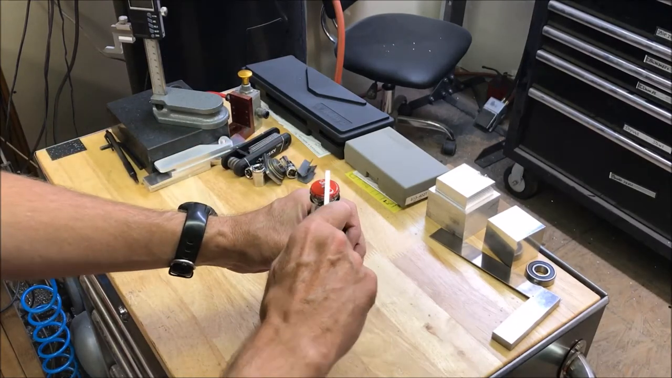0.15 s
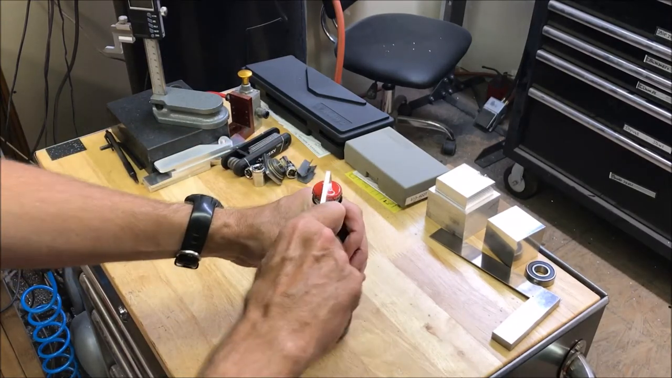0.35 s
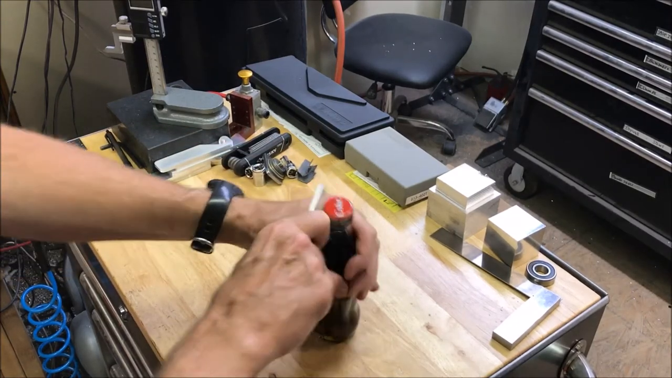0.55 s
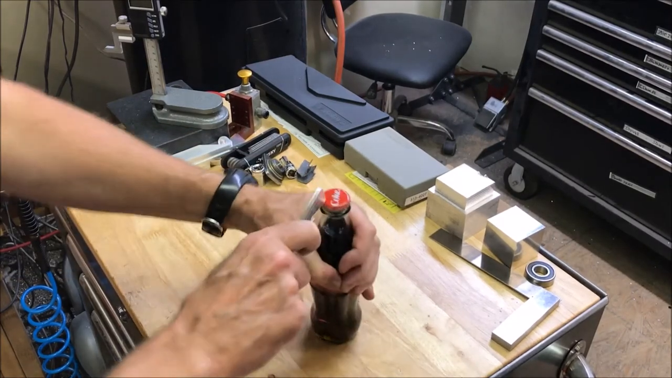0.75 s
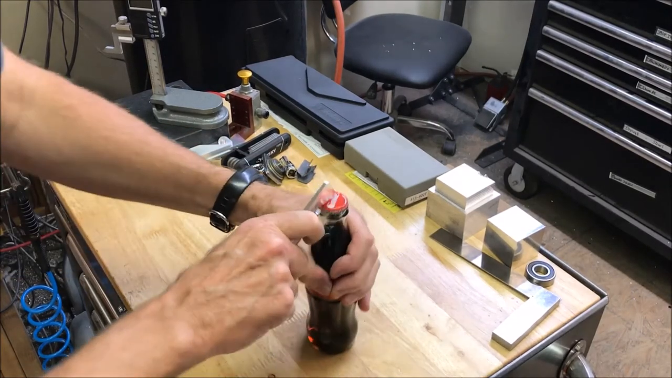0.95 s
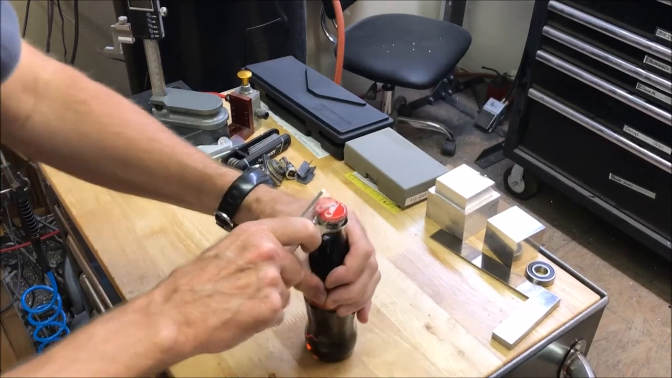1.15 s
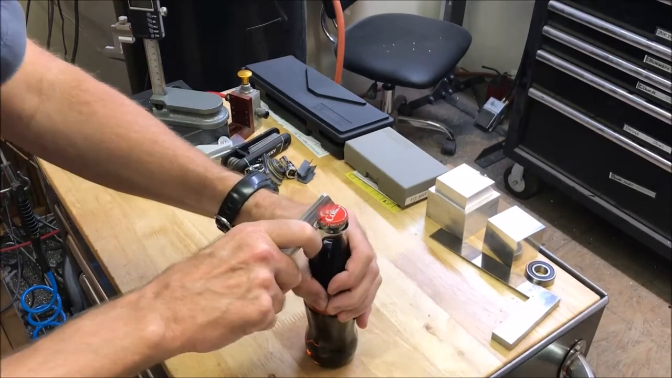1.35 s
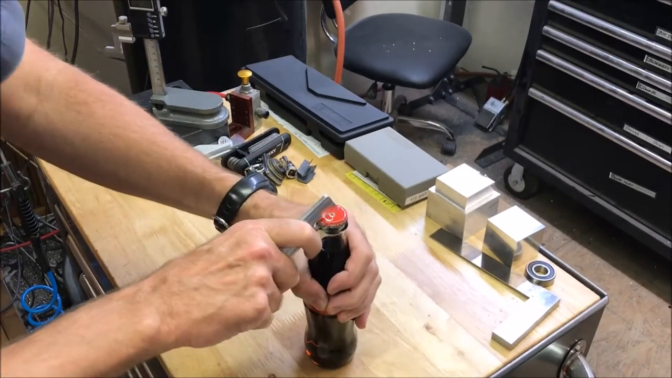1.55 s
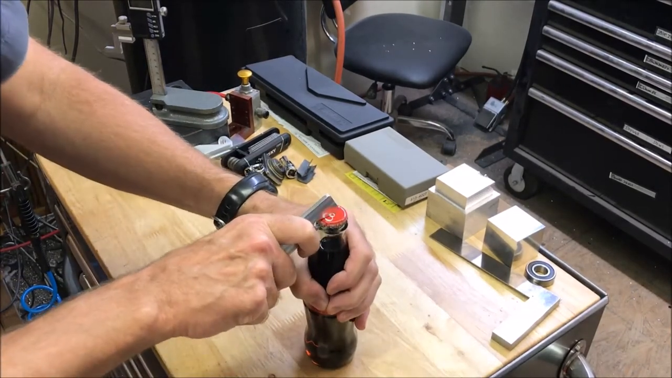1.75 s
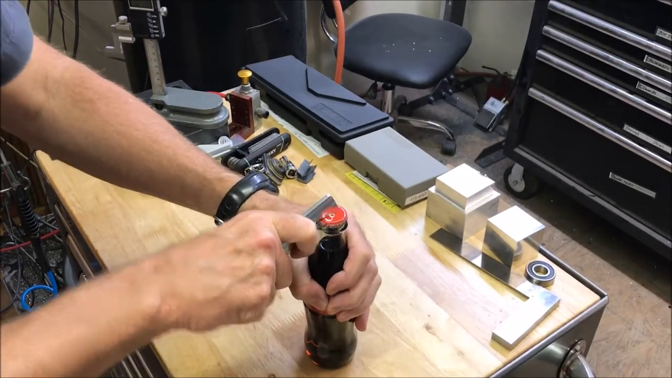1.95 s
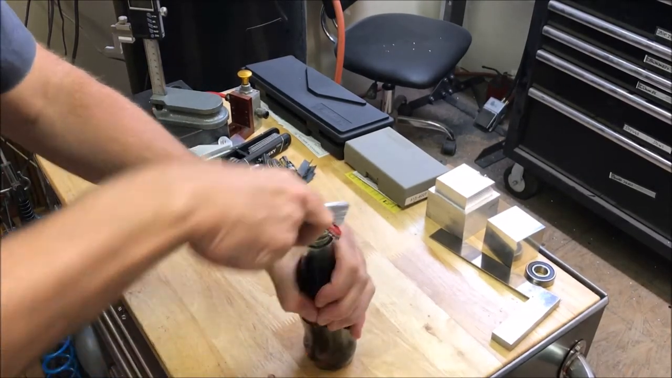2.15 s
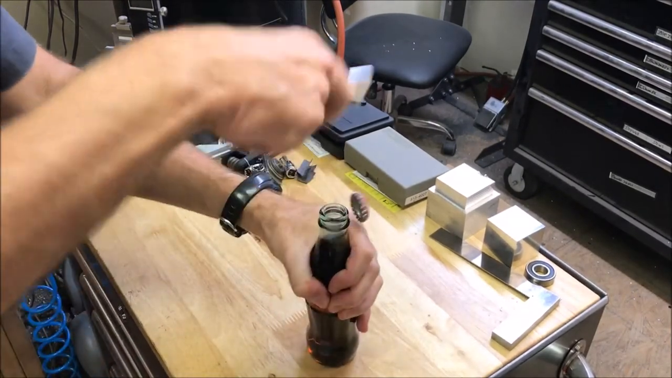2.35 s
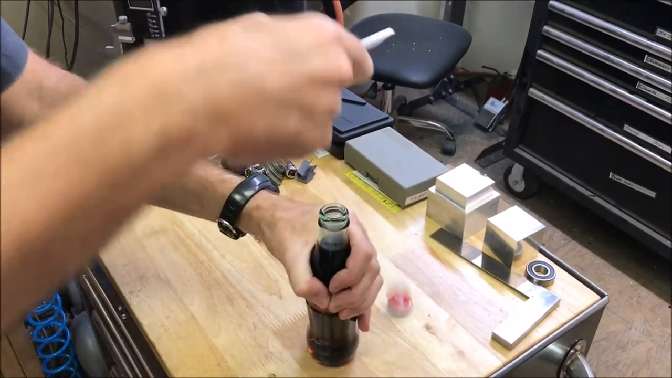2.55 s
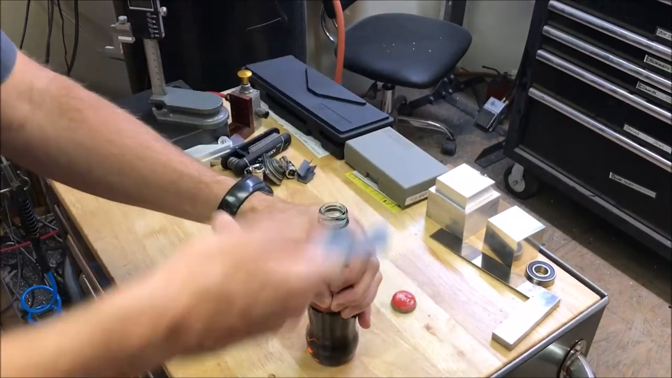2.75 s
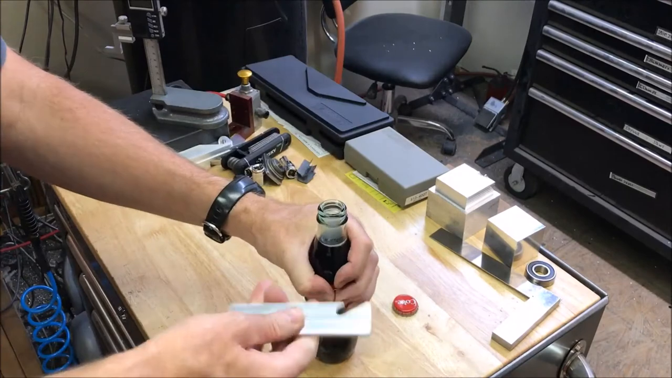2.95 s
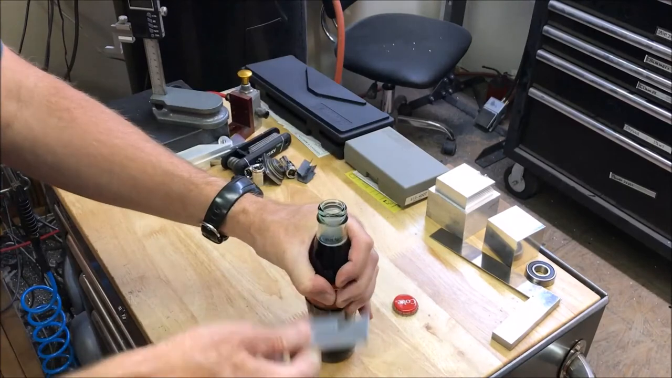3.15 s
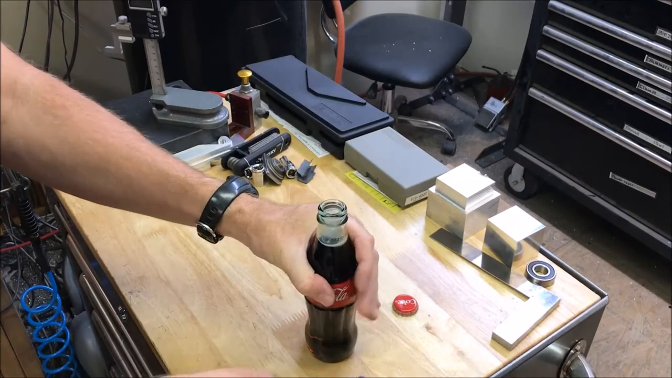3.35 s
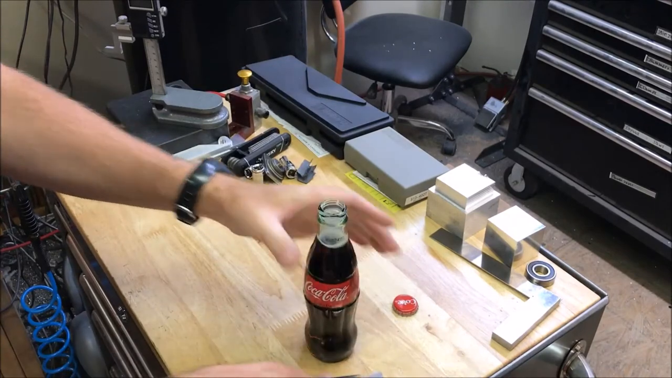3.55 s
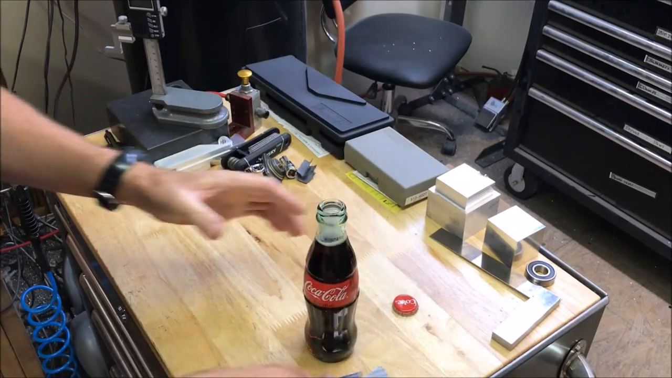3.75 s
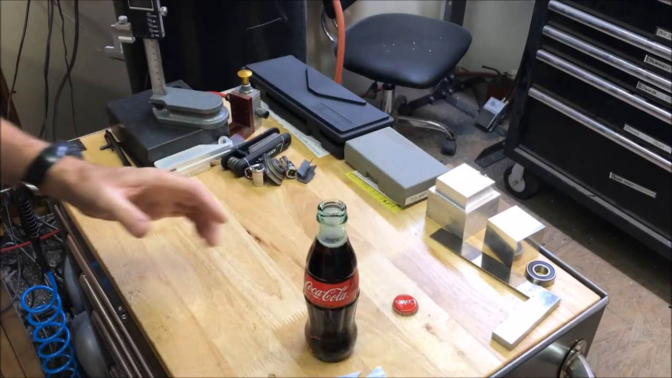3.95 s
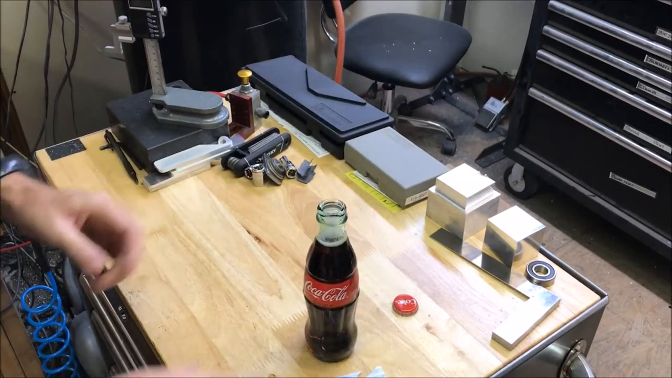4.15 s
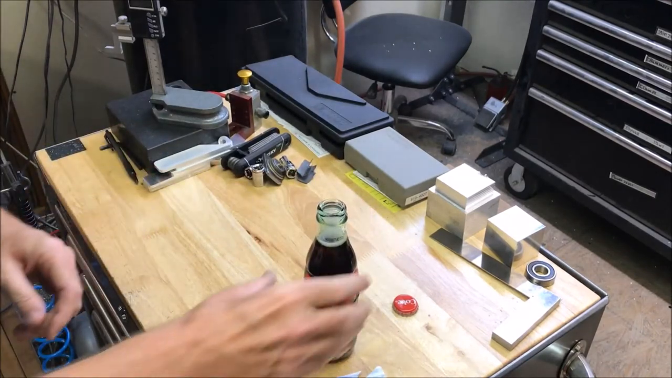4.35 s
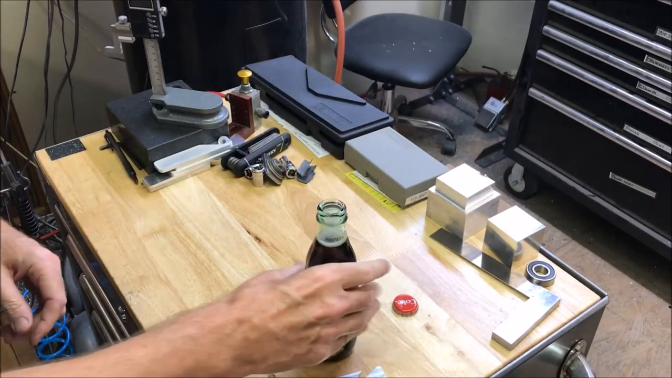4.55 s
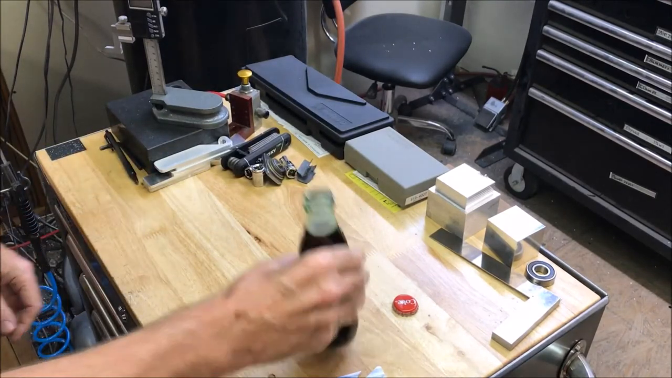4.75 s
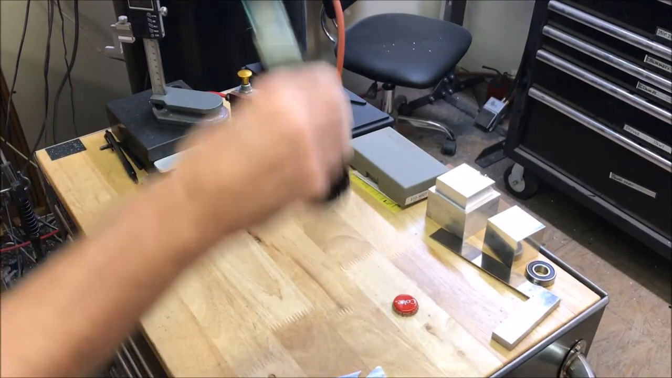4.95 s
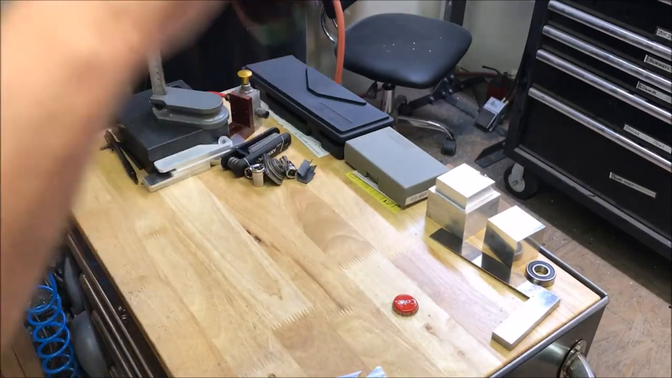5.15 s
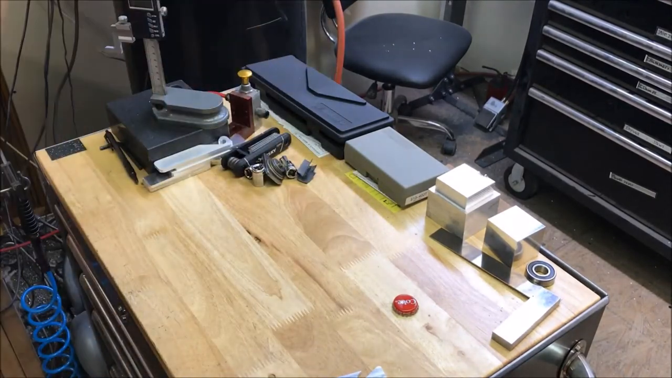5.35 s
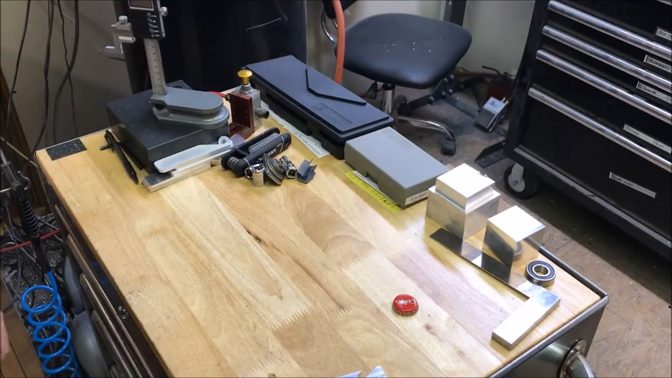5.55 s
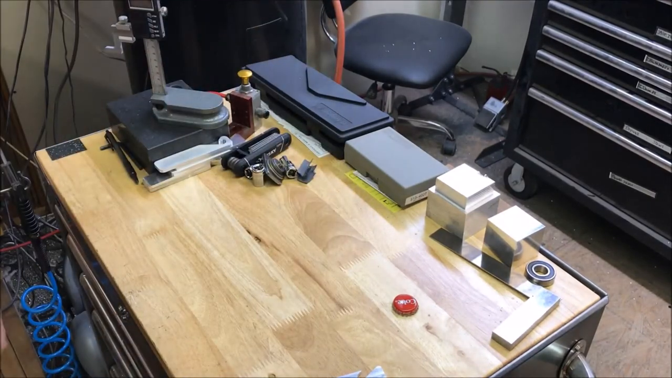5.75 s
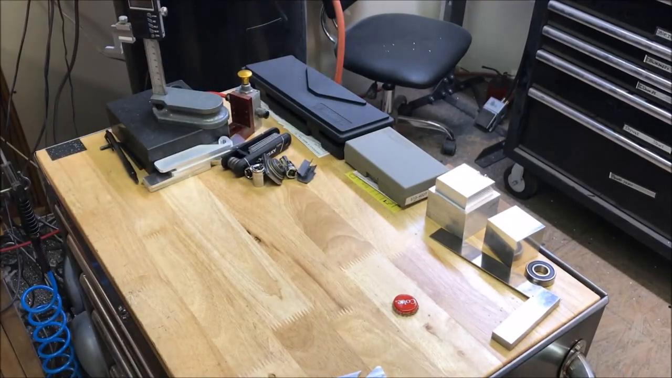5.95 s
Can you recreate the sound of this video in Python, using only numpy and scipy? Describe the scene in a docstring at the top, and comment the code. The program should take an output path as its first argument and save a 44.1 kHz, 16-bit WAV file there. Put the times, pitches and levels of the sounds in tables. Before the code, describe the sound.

A glass bottle scrapes and bumps across a wooden workbench over a low hum. A metal bar clicks on its cap, gas spits out briefly, and the cap creaks and lets go with a pop. The cap lands sharply, bouncing and ringing on the wood. The bar is laid down with a rattling knock and the bottle slides softly away. The microphone is close, in a small workshop with a short echo.

```python
"""First a low hum and a faint creak, then a glass bottle scraping and bumping over a wooden workbench.
A metal bar bites on its crown cap: gas spits out, the crimp creaks and lets go with a pop, and the cap
lands, bounces and rings on the wood. The bar is laid down and the bottle slid away.
One microphone, close to the bench in a small workshop, with the short ring of the room behind."""
import sys
import numpy as np
from scipy import signal
from scipy.fft import rfft, irfft
from scipy.io import wavfile

SR = 44100
rng = np.random.default_rng(int(sys.argv[2]) if len(sys.argv) > 2 else 0)


def store_wav(level_fs):
    """Save 16-bit WAV to argv[1]."""
    pcm = np.round(np.clip(np.atleast_2d(level_fs), -1, 1) * 32767)
    wavfile.write(sys.argv[1], SR, pcm.T.astype(np.int16))


N = 264864
TIME = np.arange(N) / SR

# Room tone. Each row: frequency in Hz, relative level in dB.
AIR_COLOUR = [(20, -34.5), (35, -15), (60, -4.5), (85, -9), (119, -5.5), (156, -12), (247, -14),
              (320, -19.5), (375, -17), (485, -23.5), (660, -23), (1300, -25), (2100, -32.5), (3300, -31.5),
              (5000, -40), (7000, -44), (8400, -41), (10500, -48), (15700, -44)]
# A machine's hum. Each row: frequency in Hz, level in dB.
HUM_TONES = [(118.6, -64.5), (247, -74.5), (385, -78.5), (646, -79)]
# The bar straining on the cap. Each row: peak time, rise and fall in seconds, level in dB,
# first and last pitch in Hz.
BAR_CREAKS = [(.017, 0.007, 0.01, -57.5, 1920, 2000), (2.215, .05, 0.036, -52.5, 789, 1277)]

# Swells of sound at the bench. Each row: peak time, rise and fall in seconds, level in dB.
PUSHES = [(.58, 0.12, .1, -64), (.632, 0.078, 0.061, -45), (.724, 0.035, 0.049, -42), (.79, .06, .22, -61),
          (.96, 0.068, 0.1, -46.5), (1.14, 0.19, 0.16, -40.5), (1.235, .04, 0.042, -50),
          (4.2, 0.24, 0.28, -66.5), (4.915, 0.074, 0.081, -45.5)]
BRIEF_SQUEAKS = [(.712, 0.023, 0.021, -47.5)]
BENCH_LEANS = [(.73, 0.088, .1, -55), (.865, .09, .11, -50.5), (1.25, 0.112, 0.063, -51)]
HAND_RELEASE = [(3.615, 0.0804, .1, -59.5)]
# Bottle and bench resonances woken by scraping. Each row: centre and width in Hz, level in dB.
SCRAPE_BANDS = [(510, 190, -20), (1460, 200, -25), (1810, 180, -20), (2716, 64, -16), (3580, 430, -18),
                (4380, 98, -19), (5680, 79, -21), (6230, 120, -24.5), (7850, 750, -20.5)]
# Tones of the brief squeak. Each row: frequency in Hz, relative level in dB.
SQUEAK_TONES = [(280, 1), (502, -2), (690, -3), (2695, 1.5), (3420, -4), (3578, -2.5), (4352, -4),
                (5655, -2), (6348, -9)]

# Blows. Each row: start in seconds, ring and crack levels in dB, angle from 0 (flat) to 1 (on edge).
BITE_BLOWS = [(.6222, -57, -31, 0.3), (1.135, -36, -28, 0.8), (2.1797, -30, -31, 0), (2.2175, -46, -35, .4),
              (2.231, -37, -33.5, 0.03), (2.2985, -34.5, -33, .9), (2.309, -32.5, -30, 0.95),
              (2.3505, -35, -35.5, 1)]
BOTTLE_BLOWS = [(.9232, -30.5, -32.5, 0.4), (.926, -25.5, -35, 0), (2.327, -32.5, -30, 0.93),
                (2.331, -26, -26, 1), (2.3355, -22, -28.5, 0.8)]
CAP_BLOWS = [(2.3498, -39.5, -36.5, 1), (2.669, -13.5, -16, .25), (2.6738, -14, -18, 0.02),
             (2.7922, -35.5, -36.5, 0), (2.807, -47, -51, 0.5), (2.868, -39.5, -41, 0.45),
             (2.878, -40, -40, 0.35), (2.9285, -37, -33.5, 0), (2.9435, -31, -35, 1),
             (2.9843, -26, -25.5, 0.98)]
BAR_BLOWS = [(3.7785, -27, -31, 0.16), (3.7885, -37, -30.5, 0.25), (3.82, -26, -24, 0),
             (3.8265, -27, -29.5, 0.16), (3.848, -33.5, -31.5, 0), (3.8935, -18.5, -26, 1),
             (3.895, -29, -25, 1)]
# Modes of the struck things. Each row: frequency in Hz, level in dB, seconds to fall 60 dB,
# gain on an edge blow in dB.
NECK_MODES = [(1281, -18, 0.076, 7.5), (2260, 1.5, 0.018, -22), (2860, -10.5, .04, -19),
              (3570, -10, 0.045, 6), (3940, 1, 0.02, -12), (5780, -14, .04, 13), (5970, -11.5, 0.013, 20),
              (6500, 2, 0.03, -15), (7220, -12.5, 0.05, 13), (8240, -3.5, 0.032, 7), (8386, -13, .04, 13),
              (9130, -5.5, .018, 6), (11710, -12, 0.044, 13.5), (12740, -15, 0.088, 14.5),
              (13510, -19, 0.07, 13.5), (14500, -22, .04, 18)]  # bar and cap pressed on the glass neck
BENCH_MODES = [(179, -3, 0.08, -11), (223, 0, .055, -2), (327, -2, 0.041, 1.5), (607, -22, 0.069, 0.5),
               (928, -11.5, 0.052, 3), (1125, -20, 0.039, 21), (1418, -13.5, 0.032, -2),
               (1747, -25, 0.051, 13)]  # the bottle standing on the bench
CAP_MODES = [(3730, -26, 0.049, 10.5), (3860, -24.5, 0.076, 9), (4167, -22, .08, 5.5), (4530, -19, .14, -3),
             (4720, -16.5, .14, -1.5), (4820, -8, .09, -8.5), (4950, -8, .1, -8.5), (5024, -16.5, .21, 1.5),
             (5060, -3, .06, -3), (7560, -4.5, .085, -13), (8485, -21, .13, 17), (7200, -23, .1, 4),
             (10100, -39, 0.0793, 9.5), (11400, -25.5, .07, -0.5), (11590, -20.5, .05, 2),
             (12715, -20.5, .095, 6.5), (13490, -33, .089, 10.5), (14350, -22.5, .06, 2),
             (14630, -17, .06, 3)]
BAR_MODES = [(1250, -10, .04, -2), (2286, -18, .16, -10), (2850, -8, .04, -1), (3730, -10, .08, -3),
             (4000, -14, .012, 13), (4203, -9, .25, -24), (5360, -17, .01, 11), (5900, -16, .009, 15),
             (6230, -17, .035, 17), (7200, -3, .025, -12), (7500, -4, .04, -12), (7810, -15, .035, 13),
             (8500, -22, .01, 21), (9300, -24, .012, 18), (11580, -24, .02, 17), (13020, -30, .035, 27),
             (13250, -28, .012, 27), (14600, -34, .01, 23), (15490, -47, .6, 27)]

# Noise spectra. Each row: frequency in Hz, relative level in dB.
GLASS_RUB = [(40, -28), (120, 4.5), (350, -3), (600, -7.5), (1000, -3.5), (1800, -1.5), (3200, -2),
             (5100, -10), (6300, -6.5), (7800, -15), (9500, -15), (12000, -18.5), (15700, -25)]
NECK_CRACK = [(100, 4), (1000, 3), (2500, -3), (6500, 1), (9000, 3.5), (10300, -2.5), (12500, 0.5),
              (15500, -6)]
GLASS_THUD = [(40, -38), (110, -9), (200, 3.5), (380, 5), (520, -0.5), (1100, -1.5), (2200, -6.5),
              (3500, -16.5), (8000, -20.5), (15500, -41)]
GAS_HISS = [(120, -59), (200, -25), (745, -21.5), (1460, -22), (1630, -17), (1850, -22.5), (2980, -16),
            (8600, -8), (10700, -9), (13600, -2), (15700, -8)]
CAP_CRACK = [(100, -30.5), (500, -21), (1800, -4.5), (2600, -4.5), (3600, 6), (4700, 6.5), (5800, -13),
             (7500, -10.5), (10000, -19), (15500, -17.5)]
BAR_CRACK = [(100, -7.5), (230, -3.5), (420, -19), (630, 2.5), (850, -6), (1150, 3.5), (1700, 1), (3800, 2),
             (5000, -1), (7500, -2.5), (10000, -15.5), (15500, -22.5)]
DRY_TICK = [(200, -25), (1000, -9), (2000, -5), (3400, 0.5), (5000, -15), (9000, -25), (15500, -43.5)]

# Things settling on the bench. Each row: start in seconds, level in dB.
SETTLING_TICKS = [(4.816, -58), (4.875, -52), (5.838, -54.5)]
# The workshop's ring. Each row: frequency in Hz, seconds to fall 60 dB.
ROOM_DECAY = [(100, 0.32), (400, 0.21), (1500, .2), (5000, .23), (9000, .19), (15000, .14)]


def amp(db):
    """Decibels to gain."""
    return 10 ** (np.asarray(db) / 20)


def unit(x):
    """Scales to rms 1."""
    return x / np.sqrt(np.mean(x ** 2) + 1e-20)


def curve_at(points, hz):
    """Reads a curve on a log-frequency axis."""
    f, value = np.transpose(points)
    return np.interp(np.log(hz + 1), np.log(f + 1), value)


def colour(x, spectrum):
    """Gives x a spectrum, at rms 1."""
    gain = amp(curve_at(spectrum, np.fft.rfftfreq(len(x), 1 / SR)))
    return unit(irfft(rfft(x) * gain, len(x)))


def band(hz, width_hz):
    """Noise in one resonance, at rms 1; centred on 0 Hz it is a random waver."""
    f = np.fft.rfftfreq(N, 1 / SR)
    return unit(irfft(rfft(rng.standard_normal(N)) / (1 + (2 * (f - hz) / width_hz) ** 2), N))


def add(mix, start_s, sound):
    """Mixes a sound in at its start time."""
    part = mix[round(start_s * SR):][:len(sound)]
    part += sound[:len(part)]


def grains(per_s, spread_db, share):
    """Smooth noise mixed with a share of sparse clicks of uneven size."""
    sizes = rng.standard_normal(N) * amp(spread_db * np.minimum(rng.exponential(1, N), 4))
    clicks = sizes * (rng.random(N) < per_s / SR)
    return np.sqrt(share) * unit(clicks) + np.sqrt(1 - share) * rng.standard_normal(N)


def gestures(rows, power):
    """Gain of hand movements: each is a smooth arch of speed raised to a power; their energies add."""
    energy = np.zeros(N)
    for s, rise_s, fall_s, db in rows:
        speed = np.sin(np.pi / 2 * np.interp(TIME, [s - rise_s, s, s + fall_s], [0, 1, 0]))
        energy += (amp(db) * speed ** power) ** 2
    return np.sqrt(energy)


def room_tone():
    """Still workshop air, a wavering machine hum and a thin high whine."""
    air = amp(-61.5) * colour(rng.standard_normal(N), AIR_COLOUR)
    hum = sum(amp(db) * np.sqrt(2) * np.sin(2 * np.pi * hz * TIME + .64 * band(0, width_hz=9))
              for hz, db in HUM_TONES)
    whine = amp(-79) * band(15800, width_hz=190)
    return air + hum + whine


def creak(glide_s=.06, rough_rad=.6):
    """A thin, slightly rough tone that rises as the bar strains against the cap's rim."""
    out = np.zeros(N)
    for s, rise_s, fall_s, db, first_hz, last_hz in BAR_CREAKS:
        hz = np.interp(TIME, [s - rise_s, s - rise_s + glide_s], [first_hz, last_hz])
        tone = np.sin(2 * np.pi * np.cumsum(hz) / SR + rough_rad * band(0, width_hz=120))
        out += gestures([(s, rise_s, fall_s, db)], power=.73) * tone
    return out


def bottle_scrape(swell_db=5, judder_db=1.2):
    """Glass catches on the wood grain, sticking and slipping so that the scrape flutters."""
    catches = colour(grains(per_s=2600, spread_db=1.5, share=.55), GLASS_RUB)
    resonances = np.zeros(N)
    for hz, width_hz, db in SCRAPE_BANDS:
        swell = amp(swell_db * band(0, width_hz=20))  # each swells and fades as the contact travels
        resonances += amp(db) * unit(band(hz, width_hz) * swell)
    judder = amp(judder_db * band(0, width_hz=110))
    return gestures(PUSHES, power=1.77) * judder * (amp(-1.5) * catches + resonances)


def rattled(blows, gap_s, ring_db, crack_db, count):
    """After each blow the object rocks and touches again lightly, at uneven gaps."""
    delays = np.cumsum(gap_s * rng.uniform(.5, 1.5, (len(blows), count)), axis=1)
    touches = [(s + delay, ring_db, crack_db, edge)
               for (s, _, _, edge), row in zip(blows, delays) for delay in row]
    return list(blows) + touches


def strike(blows, modes, spectrum, crack_t60_s, rise_s, waver_hz, snap_db):
    """Each blow is a brief crack plus the object's modes; edge and flat blows favour different modes."""
    out, t = np.zeros(N), np.arange(SR // 3) / SR
    hz, mode_db, t60, edge_db = np.transpose(modes)[:, :, None]
    mode_fade = amp(mode_db - 60 * t / t60)
    snap = amp(snap_db) * np.exp(-t / .00041)  # the instant of contact stands above the crack
    crack_fade = amp(-60 * t / crack_t60_s) + snap
    for s, ring_db, crack_db, edge in blows:
        # the object rocks on its contact, so each mode wanders in phase
        steps = rng.standard_normal(mode_fade.shape) * np.sqrt(2 * np.pi * waver_hz / SR)
        partials = mode_fade * np.sin(2 * np.pi * hz * t + np.cumsum(steps, axis=1))
        ring = amp(ring_db + edge * edge_db[:, 0]) @ partials
        crack = amp(crack_db) * crack_fade * colour(rng.standard_normal(len(t)), spectrum)
        add(out, s, (ring + crack) * (1 - np.exp(-t / rise_s)))
    return out


def bar_bites():
    """The bar bites and slips on the crimp, clicking against the glass neck."""
    blows = rattled(BITE_BLOWS, gap_s=.005, ring_db=-61, crack_db=-42, count=1)
    return strike(blows, NECK_MODES, NECK_CRACK, crack_t60_s=.02, rise_s=.00061, waver_hz=40, snap_db=-9)


def bench_rumble():
    """The bench rumbles as weight shifts on it."""
    return gestures(BENCH_LEANS, power=2) * band(62.7, width_hz=28)


def brief_squeak():
    """A brief cluster of unsteady tones during the scrape."""
    tones = sum(amp(db) * np.sin(2 * np.pi * hz * TIME + .5 * band(0, width_hz=70))
                for hz, db in SQUEAK_TONES)
    return gestures(BRIEF_SQUEAKS, power=1) * tones


def bottle_thumps():
    """Dull blows pass through the bottle into the bench as it is set down and as the cap pops."""
    return strike(BOTTLE_BLOWS, BENCH_MODES, GLASS_THUD,
                  crack_t60_s=.065, rise_s=.0017, waver_hz=2.6, snap_db=-18)


def gas_jet(start_s=2.089, attack_s=.019, hold_s=.01, jet_t60_s=.028, seep_t60_s=.08):
    """The seal lifts: a sputtering jet swells, holds, then collapses to a seep as the neck empties."""
    t = TIME - start_s
    flow = np.clip(t / attack_s, 0, 1) ** 1.6  # flow grows as a power of the opening
    emptying_s = np.maximum(t - attack_s - hold_s, 0)
    collapse = amp(-60 * emptying_s / jet_t60_s)
    seep = amp(-17.5 - 60 * emptying_s / seep_t60_s)
    sputter = colour(grains(per_s=3500, spread_db=2, share=.133), GAS_HISS)
    return amp(-23.5) * flow * np.maximum(collapse, seep) * sputter


def cap_bounces():
    """The tin cap flicks free, then lands, rattles and rings on the wood."""
    blows = rattled(CAP_BLOWS, gap_s=.007, ring_db=-58.5, crack_db=-43, count=2)
    return strike(blows, CAP_MODES, CAP_CRACK, crack_t60_s=.018, rise_s=.0002, waver_hz=4.3, snap_db=-4)


def hand_brush():
    """Skin brushes the glass as the hand lets go."""
    return gestures(HAND_RELEASE, power=1.4) * band(300, width_hz=440)


def bar_laid_down():
    """The metal bar knocks on the bench, rocking until it lies flat."""
    return strike(BAR_BLOWS, BAR_MODES, BAR_CRACK,
                  crack_t60_s=.035, rise_s=.00024, waver_hz=3.6, snap_db=-7)


def settling(t60_s=.13):
    """Light contacts on the bench that die without ringing."""
    out, t = np.zeros(N), TIME[:SR // 4]
    fade = amp(-60 * t / t60_s)
    for s, db in SETTLING_TICKS:
        add(out, s, amp(db) * fade * colour(rng.standard_normal(len(t)), DRY_TICK))
    return out


def reflections(x, first_s, build_s):
    """Dense echoes off bench, tools and near walls, each band dying at its own speed."""
    size = SR // 2
    taps = rng.choice([-1., 1.], size) * (rng.random(size) < 5000 / SR)  # about 5000 echoes a second
    hz, t, spectra = signal.stft(taps, SR, nperseg=256)
    fade = amp(-60 * t / curve_at(ROOM_DECAY, hz)[:, None])
    tail = signal.istft(spectra * fade, SR, nperseg=256)[1][:size]
    tail *= np.clip((TIME[:size] - first_s) / build_s, 0, 1)
    return signal.fftconvolve(x, tail / np.linalg.norm(tail))[:N]


def scene():
    """The bench sounds reach the microphone directly and, weaker, off the walls, over the room tone."""
    levering = creak() + bar_bites()
    handling = bottle_scrape() + bench_rumble() + brief_squeak() + hand_brush() + settling()
    thumps, jet, cap, bar = bottle_thumps(), gas_jet(), cap_bounces(), bar_laid_down()
    direct = levering + handling + thumps + jet + cap + bar
    to_room = amp(-6) * cap + amp(-7) * (levering + bar) + amp(-9) * (thumps + handling) + amp(-10.5) * jet
    return (direct + reflections(to_room, first_s=.0026, build_s=.0051) + room_tone())[None]


def record(dry):
    """The microphone's bass roll-off, then the recorder's steep band limit."""
    low_hz, top_hz = 46, 15800
    thinned = signal.sosfilt(signal.butter(4, low_hz, "highpass", fs=SR, output="sos"), dry)
    band_limit = signal.firwin(511, top_hz, window=("kaiser", 8), fs=SR)
    return signal.oaconvolve(thinned, band_limit[None], "same")


dry = scene()
out = record(dry)
store_wav(out)
```